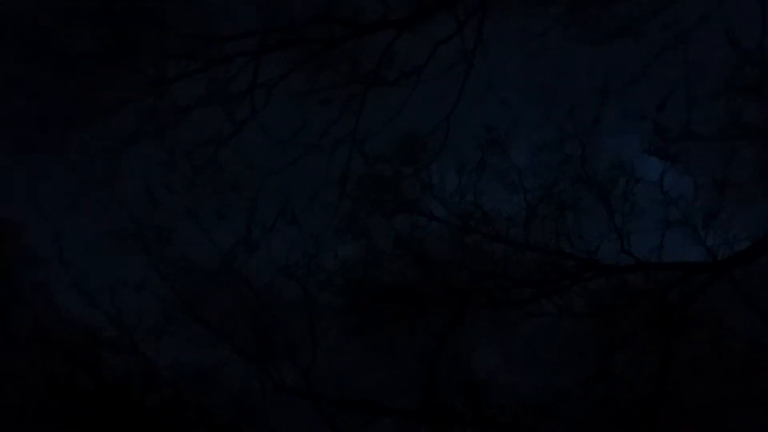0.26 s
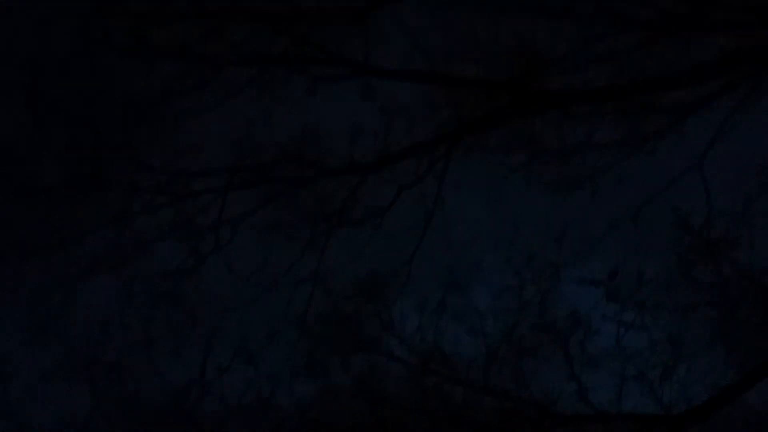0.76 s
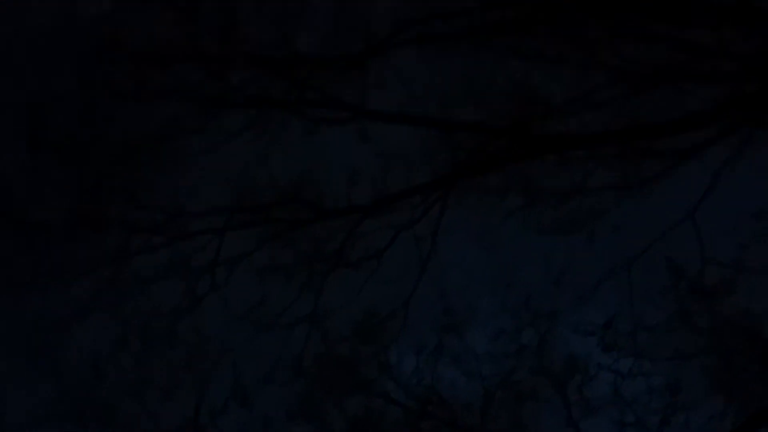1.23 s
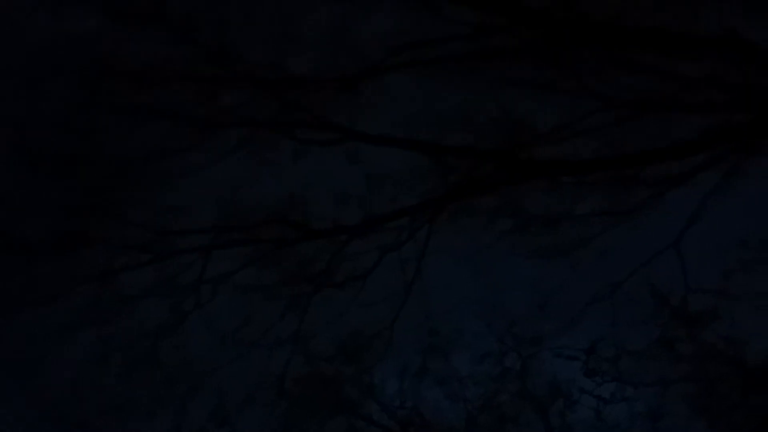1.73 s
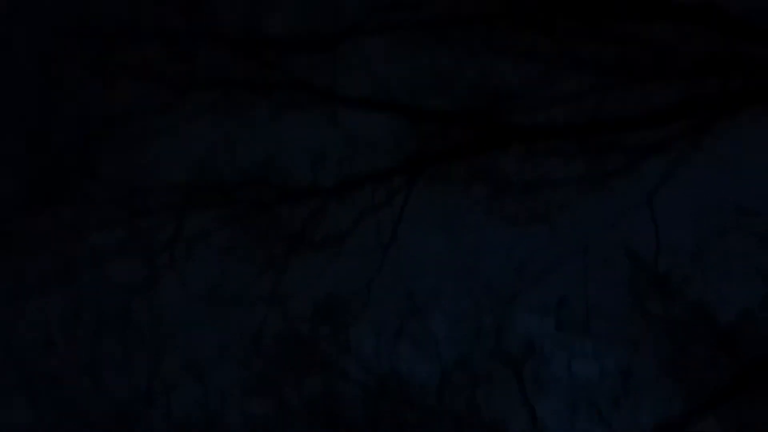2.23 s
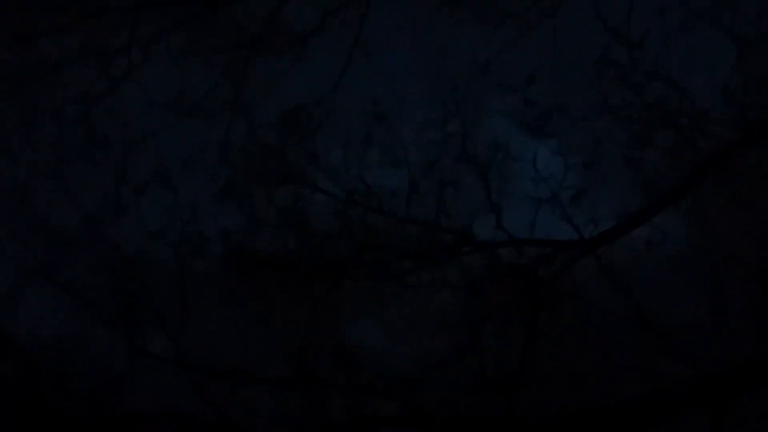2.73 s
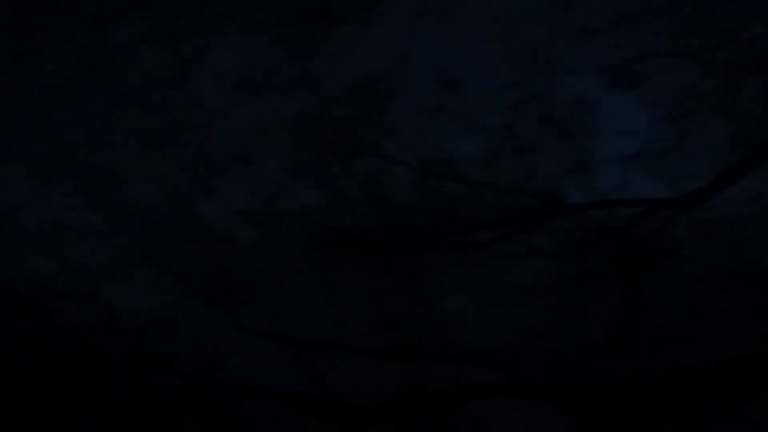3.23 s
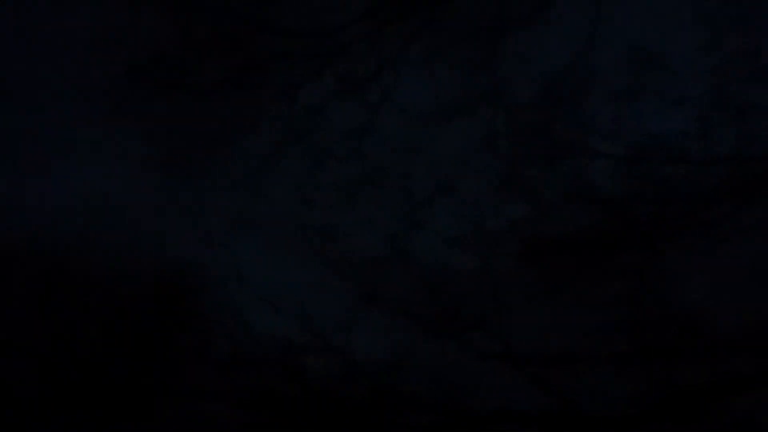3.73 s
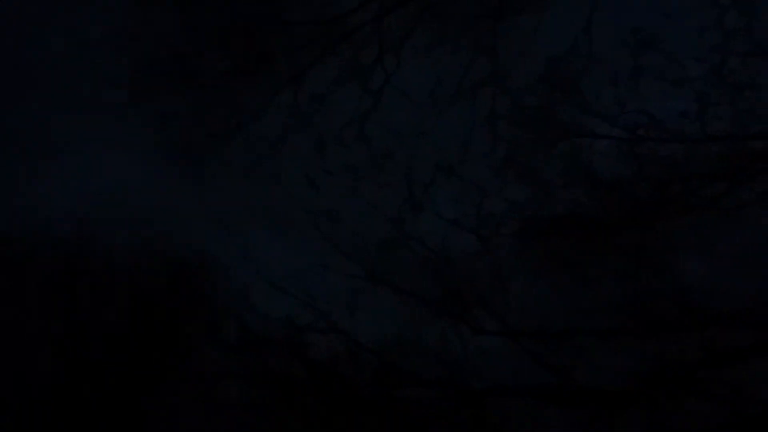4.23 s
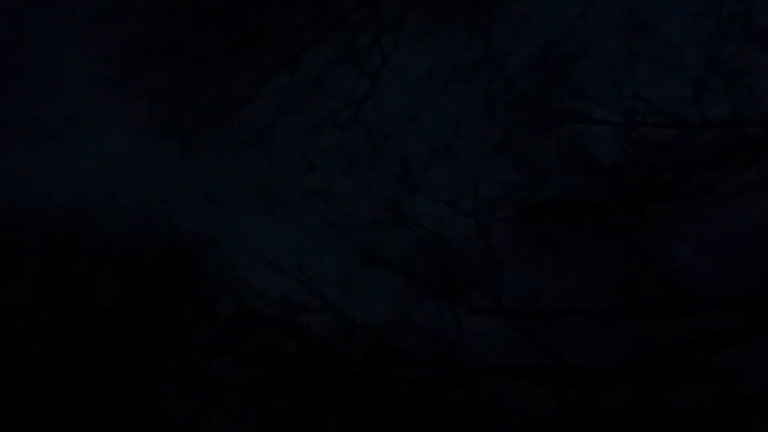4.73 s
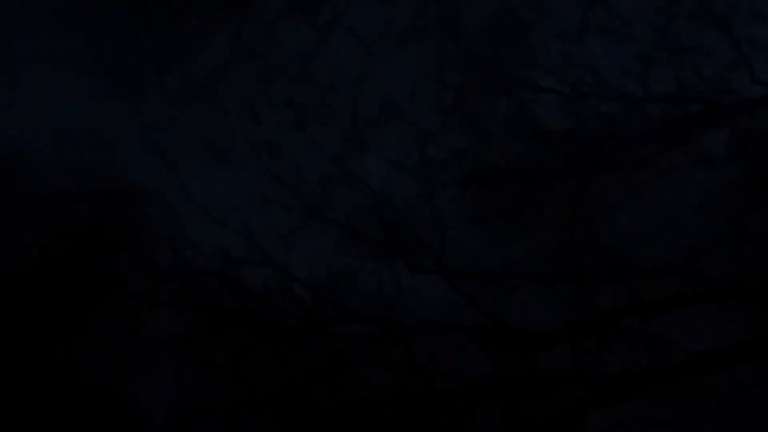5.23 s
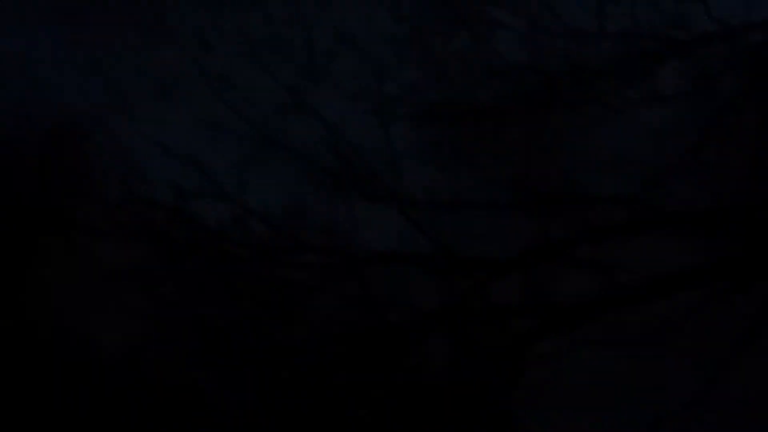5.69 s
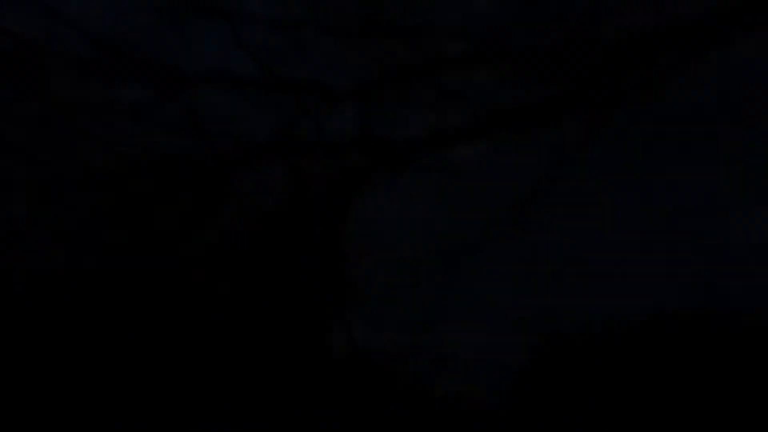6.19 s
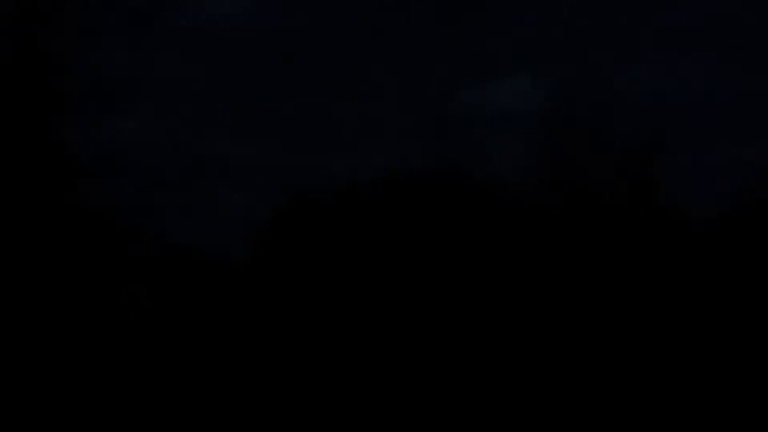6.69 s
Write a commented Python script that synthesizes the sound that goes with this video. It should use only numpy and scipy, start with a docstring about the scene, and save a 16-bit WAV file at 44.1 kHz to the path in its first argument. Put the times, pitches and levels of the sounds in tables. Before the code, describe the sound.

A dense frog chorus of overlapping rising peeps and clicks in woods, over a low distant traffic rumble.

```python
"""Tree frogs at dusk

Near frogs whistle rising peeps from their vocal sacs, hundreds more blur into a band behind them,
and clicking frogs ring their throats in short high pips, all scattered by the trunks of a wood.
Distant traffic rumbles and a far bird yelps. Mostly late on, a hand shifts on a camera with two
microphone ports: small ticks, soft knocks and a rustle of clothing."""
import sys
import numpy as np
from scipy import signal
from scipy.fft import rfft, irfft, next_fast_len
from scipy.io import wavfile
from scipy.ndimage import map_coordinates

SR = 44100
rng = np.random.default_rng(int(sys.argv[2]) if len(sys.argv) > 2 else 0)


def generate_wav(signal):
    """Clip the signal to [-1, 1] and save it as 16-bit WAV at the path in sys.argv[1]."""
    frames = np.transpose(np.atleast_2d(signal))
    scaled = np.clip(frames, -1, 1) * 32767
    pcm = np.round(scaled).astype(np.int16)
    wavfile.write(sys.argv[1], SR, pcm)


N = 306495
TIME = np.arange(N) / SR

# Levels in the tables are relative: each layer sets its own gain on top.
# stereo width of the noise beds: (frequency [Hz], left-right correlation [-1..1])
PORT_CORRELATION = [(30, 0.92), (100, 1), (180, 0.87), (350, 0.68), (700, 0.4), (1400, -0.62), (2500, 0.31),
                    (16000, -0.16)]
# tone of the distant traffic: (frequency [Hz], gain [dB])
TRAFFIC_EQ = [(20, -46), (32, -42), (46, -17.5), (67, 2), (85, -2.5), (140, -3.5), (175, -9), (240, -14.5),
              (400, -54), (900, -62)]
# a far engine drones past: (time [s], pitch [Hz], level [dB])
ENGINE_PASS = [(.7, 150, -58.5), (1.1, 149, -50.5), (1.6, 144, -46.5), (1.85, 138, -55.5), (2.3, 134, -61)]
# tone of the wood's air on each side: (frequency [Hz], gain [dB])
AIR_LEFT_EQ = [(100, 0.5), (250, -4), (450, -3), (750, 0.5), (1000, -1), (1300, 1), (1800, -2), (2300, -7),
               (3500, -16.5), (5000, -26.5)]
AIR_RIGHT_EQ = [(100, -10.5), (250, -4.5), (450, -3), (750, -1), (1000, -2.5), (1400, -2.5), (1800, -7.5),
                (2300, -11), (3500, -17), (5000, -59)]
# fader ride of the air: (time [s], level [dB])
AIR_LEVEL = [(0, -52), (3, -52), (4.6, -54.5), (5.5, -53.5), (6.95, -52.5)]
# tone of each port's hiss: (frequency [Hz], gain [dB])
HISS_LEFT_EQ = [(2000, -23), (3800, -1.5), (4400, 0.5), (4900, -4.5), (6000, -0.5), (6800, 2), (8000, -3.5),
                (9500, -1.5), (10200, -8.5), (11000, -1), (11600, 1), (12400, -9.5), (15300, -6),
                (16000, -21)]
HISS_RIGHT_EQ = [(2000, -5), (4300, -3.5), (5000, -6), (7000, -14), (8000, -7.5), (8900, -7.5), (10000, -9),
                 (11300, -9.5), (14500, -6), (15400, -16), (16000, -16)]
# a far bird's yelps: (time [s], pitch [Hz], level [dB])
YELPS = [(1.611, 1390, -61), (1.761, 1246, -56.5), (1.891, 1392, -55)]
# faint distant tones: (time [s], length [s], pitch [Hz], level [dB])
FAR_TONES = [(5.05, 1, 503, -67), (6.628, 0.5, 1314, -63)]
# the clearest handling ticks: (time [s], level [dB], left over right [dB])
TICKS = [(0.1797, -34.5, -18), (2.4646, -41.5, -14), (4.9876, -27.5, -15), (5.2323, -33, -12),
         (5.4346, -38, -11), (5.4983, -35, -17), (5.7972, -23.5, 10), (5.8086, -29, -11.5),
         (6.461, -37, -8), (6.7172, -34.5, -4)]
# rustles of clothing: (time [s], length [s], level [dB])
RUSTLES = [(2.281, 0.13, -67.5), (5.193, 0.11, -71), (5.422, 0.17, -67.5), (5.738, 0.073, -60),
           (6.422, 0.42, -70.5)]
# tone of the ticks and rustles: (frequency [Hz], gain [dB])
HANDLING_EQ = [(1000, 6), (3500, -1), (5500, -3), (7000, 4), (9000, 4.5), (12000, -4.5), (16000, 1)]
# knocks of the hand on the case: (time [s], level [dB], band centre [Hz], decay [s])
KNOCKS = [(5.450, -35.5, 686, 0.0071), (5.497, -35.5, 280, 0.006), (5.607, -34, 276, 0.0038),
          (5.797, -27.5, 380, 0.0037), (5.889, -38.5, 590, 0.0083), (6.460, -33, 1370, 0.003),
          (6.677, -35, 390, 0.004), (6.869, -30, 676, 0.0034)]
# the chorus pans as the camera turns from the pond: (time [s], left over right [dB])
FROG_PAN = [(0, 7.5), (2.2, 4.5), (4.6, 8.5), (5.6, 4), (6.95, 3.5)]
# the band of the farthest frogs: (frequency [Hz], gain [dB])
CHORUS_EQ = [(2250, -33), (2420, -10), (2560, 3.5), (2680, 2.5), (2800, 2.5), (2950, -4.5), (3080, -3.5),
             (3200, -6.5), (3400, -18.5), (3600, -27), (3900, -52)]
# fader ride of the far chorus: (time [s], level [dB])
CHORUS_LEVEL = [(0, -36.5), (1.35, -39.5), (1.9, -36.5), (2.6, -37.5), (3.3, -37), (3.9, -37.5), (4.3, -37),
                (5.3, -38.5), (5.6, -40), (6.95, -38)]
# even bouts of the clicking frogs: (first pip [s], last pip [s], rough spacing [s], level [dB])
PIP_BOUTS = [(0.048, 0.105, .06, -30), (1.104, 1.401, .1, -35), (1.575, 1.941, .125, -37),
             (2.957, 3.064, .1, -33), (3.336, 3.61, .09, -31), (3.886, 4.156, .09, -34.5),
             (4.917, 5.019, .1, -37.5), (5.145, 5.723, .115, -34)]
# contour of every peep: (share of length [0..1], share of pitch climb [0..1], level [dB])
PEEP_SHAPE = [(0, 0, -7), (.2, .22, -2), (.45, .5, 2), (.7, .79, 3), (.88, 1, 1), (1, .97, -3)]
# foreground peeps: (time [s], length [s], start pitch [Hz], level [dB], left phase lead [rad])
NEAR_PEEPS = [(0.046, 0.064, 2350, -49.5, -0.5), (0.126, 0.17, 2660, -38.5, 3),
              (0.366, 0.1, 2510, -44.5, 1.5), (0.556, 0.17, 2745, -35, 1.6), (0.586, 0.18, 2610, -38, 1.2),
              (0.816, 0.21, 2610, -39, 3.5), (0.946, 0.23, 2450, -36, -0.2), (1.186, 0.064, 2350, -51, -1),
              (1.186, 0.14, 2530, -40.5, 0), (1.246, 0.14, 2700, -41.5, 1.2), (1.426, 0.2, 2590, -40, 2.5),
              (1.616, 0.06, 2330, -51, 0.5), (1.706, 0.11, 2510, -42.5, 1.5), (1.716, 0.18, 2740, -35, 2.5),
              (1.826, 0.15, 2690, -42, 1), (1.996, 0.17, 2600, -38, 2.5), (2.066, 0.11, 2790, -37.5, -1.5),
              (2.256, 0.17, 2630, -40.5, 0.9), (2.256, 0.21, 2495, -35, 0.66),
              (2.496, 0.14, 2540, -36.5, 0.3), (2.656, 0.1, 2350, -53, 0), (2.656, 0.2, 2590, -33.5, -2.5),
              (2.866, 0.062, 2350, -50.5, 0), (2.956, 0.168, 2800, -33, 3),
              (2.996, 0.11, 2660, -39.5, -1.5), (3.296, 0.12, 2750, -41, -4), (3.296, 0.2, 2500, -40, -1.5),
              (3.436, 0.098, 2780, -35.5, -2.7), (3.706, 0.192, 2540, -37, -2),
              (3.876, 0.16, 2640, -38, 0.1), (3.996, 0.23, 2450, -33.5, -2), (4.116, 0.08, 2340, -46, -1.2),
              (4.146, 0.15, 2810, -36.5, -1.4), (4.346, 0.16, 2660, -36, 0.5),
              (4.536, 0.094, 2680, -39.5, -2.5), (4.696, 0.19, 2530, -40, -3),
              (4.756, 0.13, 2690, -47.5, 0.5), (4.926, 0.18, 2540, -38, 0.5), (4.976, 0.13, 2700, -42, 2.5),
              (5.216, 0.17, 2770, -37, -1.2), (5.256, 0.21, 2430, -35, -1.8), (5.466, 0.09, 2340, -48, 1),
              (5.496, 0.14, 2670, -38.5, 0.4), (5.516, 0.11, 2530, -37, -2.5),
              (5.976, 0.16, 2660, -47, -2.5), (6.036, 0.12, 2520, -42.5, -2),
              (6.176, 0.15, 2730, -41, -3.5), (6.576, 0.148, 2830, -42.5, -2), (6.596, 0.16, 2440, -41, 2),
              (6.866, 0.09, 2760, -38, 1.2), (6.876, 0.08, 2330, -52, 0.2)]


def gain_of(db):
    """Decibels to amplitude."""
    return 10 ** (np.asarray(db) / 20)


def unit_rms(x):
    """Scales to rms 1."""
    return x / np.sqrt(np.mean(abs(x) ** 2) + 1e-20)


def spectrum_at(points, hz):
    """Reads a spectrum table on a log-frequency axis."""
    f, value = np.transpose(points)
    return np.interp(np.log(hz + 1), np.log(f + 1), value)


def follow(rows, column=1):
    """One column of an automation curve at every sample."""
    rows = np.asarray(rows)
    return np.interp(TIME, rows[:, 0], rows[:, column])


def equalise(x, eq):
    """Filters by an EQ table."""
    size = next_fast_len(x.shape[-1])
    gains = gain_of(spectrum_at(eq, np.fft.rfftfreq(size, 1 / SR)))
    return irfft(rfft(x, size) * gains, size)[..., :x.shape[-1]]


def wander(t, per_s):
    """Smooth random drift of rms about 1, through per_s points a second."""
    knots = rng.standard_normal(1024)
    return map_coordinates(knots, [t * per_s], order=3, mode="wrap")


def pan(balance_db):
    """Left and right gains of mean power 1; positive leans left."""
    return unit_rms(gain_of(np.array([[1], [-1]]) * balance_db / 2))


def add(mix, s, sound):
    """Mixes a stereo sound in at time s."""
    start = round(s * SR)
    sound = sound[:, max(-start, 0):]
    part = mix[:, max(start, 0):][:, :sound.shape[1]]
    part += sound[:, :part.shape[1]]


def woods(x, t60, predelay_s=0.0041, echoes_per_s=1500):
    """Trunks scatter the sound: sparse echoes of random sign, different at each port."""
    t = np.arange(SR) / SR
    taps = rng.standard_normal((2, SR)) * (rng.random((2, SR)) < echoes_per_s / SR)
    taps *= (t > predelay_s) * gain_of(-60 * t / t60)
    return signal.fftconvolve(x, taps / np.linalg.norm(taps, axis=1, keepdims=True), axes=1)[:, :N]


def noise_bed(left_eq, right_eq):
    """Shaped stereo noise, nearly mono in the bass and wide higher up."""
    size = next_fast_len(N)
    left, other = rfft(rng.standard_normal((2, size)))
    shared = np.clip(spectrum_at(PORT_CORRELATION, np.fft.rfftfreq(size, 1 / SR)), -1, 1)
    right = shared * left + np.sqrt(1 - shared ** 2) * other
    noise = irfft(np.array([left, right]), size)[:, :N]
    return unit_rms(np.array([equalise(noise[0], left_eq), equalise(noise[1], right_eq)]))


def background(traffic_db=-52.5, swell_db=0.64, air_db=3, hiss_db=-57.5):
    """Traffic rumble with one droning engine, the soft roar of the wood, and microphone hiss."""
    traffic = noise_bed(TRAFFIC_EQ, TRAFFIC_EQ) * gain_of(traffic_db + swell_db * wander(TIME, 4))
    air = noise_bed(AIR_LEFT_EQ, AIR_RIGHT_EQ) * gain_of(follow(AIR_LEVEL) + air_db)
    hiss = noise_bed(HISS_LEFT_EQ, HISS_RIGHT_EQ) * gain_of(hiss_db)
    turns = np.cumsum(follow(ENGINE_PASS) * (1 + 0.0302 * wander(TIME, 25))) / SR
    engine = np.sin(2 * np.pi * turns) * gain_of(follow(ENGINE_PASS, column=2) + 2 * wander(TIME, 43))
    return traffic + engine + air + hiss


def far_bird_and_tones(yelp_s=0.054, fall=0.079, direct_db=-0.5, echo_db=-4):
    """A bird's hoarse falling yelps and two wavering tones carry through the trees."""
    out, t = np.zeros((2, N)), np.arange(int(yelp_s * SR)) / SR
    for s, hz, db in YELPS:
        turns = np.cumsum(hz * (1 + fall * (.5 - t / yelp_s) + 0.056 * wander(t, 184))) / SR
        yelp = np.sin(2 * np.pi * turns) * signal.windows.hann(len(t))
        add(out, s, gain_of(db) * pan(2.2) * unit_rms(yelp))
    for s, length, hz, db in FAR_TONES:
        t = np.arange(int(length * SR)) / SR
        turns = np.cumsum(hz * (1 + 0.016 * wander(t, 60.6))) / SR
        tone = np.sin(2 * np.pi * turns) * signal.windows.tukey(len(t), .5)
        add(out, s, gain_of(db) * pan(0) * unit_rms(tone))
    return gain_of(direct_db) * out + gain_of(echo_db) * woods(out, t60=0.46)


def ticks_and_rustles(tick_db=6, decay_s=0.00077, rustle_db=12, grains_per_s=4000):
    """The grip on the camera shifts in tiny dry snaps; clothing rustles in crowds of fine grains."""
    out, t = np.zeros((2, N)), np.arange(2048) / SR
    faint_ticks = [(s, -43, -6) for s in rng.uniform(5.05, 6.9, 10)]  # columns as in TICKS
    for s, db, balance_db in list(TICKS) + faint_ticks:
        snap = rng.standard_normal((2, len(t))) * np.exp(-t / decay_s)
        snap /= abs(snap).max(axis=1, keepdims=True)
        add(out, s, gain_of(db + tick_db) * pan(balance_db) * snap)
    for s, length, db in RUSTLES:
        grains = rng.standard_normal((2, N)) * (rng.random(N) < grains_per_s / SR)
        size = int(length * SR)
        add(out, s, gain_of(db + rustle_db) * unit_rms(grains[:, :size]) * signal.windows.hann(size))
    return equalise(out, HANDLING_EQ)


def knocks(trim_db=1, balance_db=-3, band_ratio=1.82, tail_db=-22, tail_s=0.037, width=0.87):
    """Fingers push on the case: a dull, damped thud with a short shudder after it."""
    out, t = np.zeros((2, N)), np.arange(4096) / SR
    for s, db, hz, decay_s in KNOCKS:
        shake = rng.standard_normal(len(t)) + width * rng.standard_normal((2, len(t)))
        envelope = np.exp(-t / decay_s) + gain_of(tail_db) * np.exp(-t / tail_s)
        band = signal.butter(2, [hz / band_ratio, hz * band_ratio], "band", fs=SR, output="sos")
        thud = signal.sosfilt(band, shake * envelope)
        thud /= abs(thud).max(axis=1, keepdims=True)
        add(out, s, gain_of(db + trim_db) * pan(balance_db) * thud)
    return out


def clicking_frogs(near_hz=3350, far_hz=3270, rise_s=0.0024, trim_db=-1.5, vary_db=4.0, echo_db=-5,
                   far_per_s=130, rest_db=-69.5, roused_db=-56.5, roused_s=0.52):
    """Each pulse rings the throat for a few ms. Near frogs pip in bouts; far ones rattle along."""
    t = np.arange(700) / SR
    swell = (t / rise_s * np.exp(1 - t / rise_s)) ** 4
    out, roused = np.zeros((2, N)), np.zeros(N)
    for first, last, gap, db in PIP_BOUTS:
        for s in np.linspace(first, last, round((last - first) / gap) + 1):
            detune, bearing, force = rng.uniform(-1, 1, 3)
            turns = near_hz * (1 + 0.017 * detune) * t + np.array([[0], [bearing / 2]])
            add(out, s, gain_of(db + trim_db + vary_db * force) * swell * np.sin(2 * np.pi * turns))
        from_bout_s = TIME - np.clip(TIME, first, last)
        roused = np.maximum(roused, np.exp(-(from_bout_s / roused_s) ** 2))
    pulses = rng.uniform(-1, 1, (2, N)) * (rng.random(N) < far_per_s / SR)
    far_pip = swell * np.sin(2 * np.pi * far_hz * t)
    rattle = signal.oaconvolve(pulses, far_pip[None])[:, :N]
    out += unit_rms(rattle) * (gain_of(rest_db) + gain_of(roused_db) * roused)
    return pan(balance_db=7) * (out + gain_of(echo_db) * woods(out, t60=0.45))


def peep(length, start_hz, climb_hz_per_s=1900, typical_hz=2597, waver=0.002, flutter_db=2.0):
    """The vocal sac rings as a nearly pure tone (complex) that rises, swells, levels off and stops."""
    t = np.arange(int(length * SR)) / SR
    share, rise, level_db = np.transpose(PEEP_SHAPE)
    climb_hz = climb_hz_per_s * length * (start_hz / typical_hz) ** 1.715  # higher voices climb faster
    hz = start_hz + climb_hz * np.interp(t / length, share, rise)
    turns = np.cumsum(hz * (1 + waver * wander(t, 92.6))) / SR
    swell = gain_of(np.interp(t / length, share, level_db) + flutter_db * wander(t, 66.7))
    return np.sqrt(2) * unit_rms(swell * signal.windows.tukey(len(t), .12)) * np.exp(2j * np.pi * turns)


def far_frogs(count=400, trim_db=-1, spread_db=2.5, crowd_db=-3.5, lead_in_s=0.2):
    """Many frogs peep at random over the pond, a few closer; the farthest melt into a band of noise."""
    out = np.zeros((2, N))
    for k, (jitter, pitch, duration, bearing, distance) in enumerate(rng.random((count, 5))):
        call = peep(length=0.1113 + 0.0803 * duration, start_hz=2490 + 330 * pitch)
        place = np.exp([[0], [2j * np.pi * bearing]]) * gain_of(-spread_db * np.log(distance + 0.2))
        s = (k + jitter) / count * (N / SR + lead_in_s) - lead_in_s
        add(out, s, (place * call).real)
    calls = unit_rms(out + 0.39 * woods(out, t60=0.46))
    crowd = unit_rms(equalise(rng.standard_normal((2, N)), CHORUS_EQ))
    chorus = unit_rms(calls + gain_of(crowd_db) * crowd)
    return chorus * pan(follow(FROG_PAN)) * gain_of(follow(CHORUS_LEVEL) + trim_db)


def near_frogs(direct_db=0.5, trunks_db=-10.5, echo_db=-11, overtone_db=-33, full_leak_hz=2850):
    """Peeps reach each port with their own level and phase; trunk echoes beat with the glide."""
    out, balance_db = np.zeros((2, N)), follow(FROG_PAN)
    for s, length, start_hz, db, lead in NEAR_PEEPS:
        call = peep(length, start_hz)
        phase = np.unwrap(np.angle(call))
        hz = np.gradient(phase) * SR / (2 * np.pi)
        # the whistle is the second harmonic of the folds; the third leaks out as the pitch climbs
        leak = gain_of(overtone_db) * np.minimum(hz / full_leak_hz, 1) ** 12
        call = call + leak * abs(call) * np.exp(3j * phase / 2)
        place = pan(balance_db[int(s * SR)]) * np.exp([[0], [-1j * lead]])
        add(out, s, gain_of(db) * (place * call).real)
    close_trunks = gain_of(trunks_db) * woods(out, t60=0.58, predelay_s=0.009)
    long_tail = gain_of(echo_db) * woods(out, t60=1.0)
    return gain_of(direct_db) * out + close_trunks + long_tail


def scene():
    """Frogs near and far over the ambience, with handling noise up close."""
    frogs = near_frogs() + far_frogs() + clicking_frogs()
    return frogs + far_bird_and_tones() + background() + ticks_and_rustles() + knocks()


def record(dry, low_cut_hz=38, high_cut_hz=15900):
    """A steep low cut and a brick-wall high cut on the whole mix."""
    low_cut = signal.butter(6, low_cut_hz, "high", fs=SR, output="sos")
    high_cut = signal.firwin(511, high_cut_hz, window=("kaiser", 9), fs=SR)
    return signal.oaconvolve(signal.sosfilt(low_cut, dry), high_cut[None], "same")


dry = scene()
out = record(dry)
generate_wav(out)
```